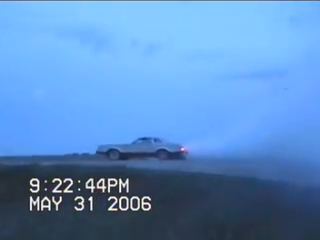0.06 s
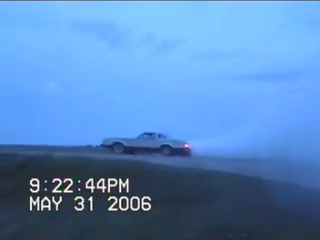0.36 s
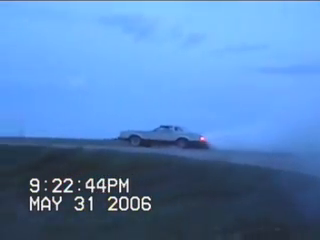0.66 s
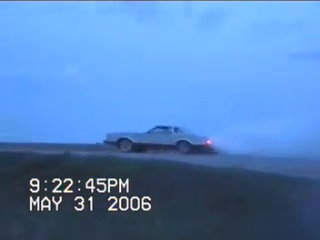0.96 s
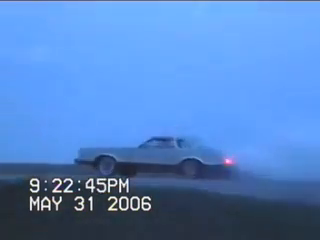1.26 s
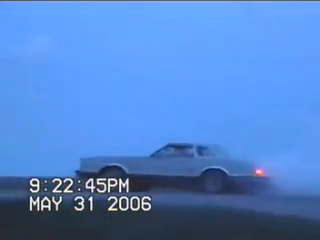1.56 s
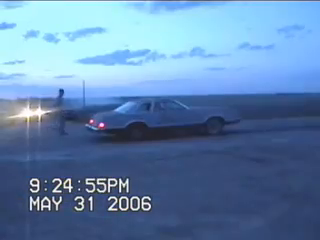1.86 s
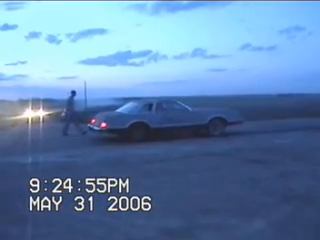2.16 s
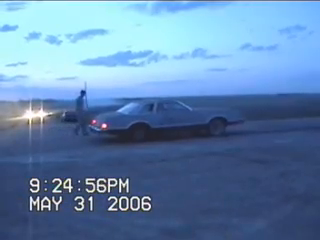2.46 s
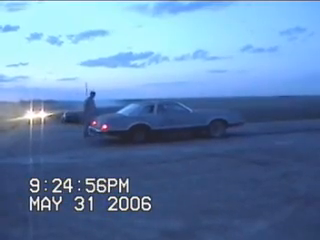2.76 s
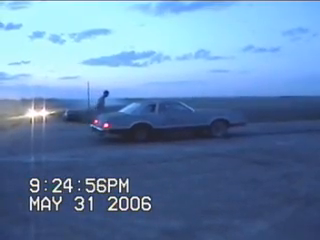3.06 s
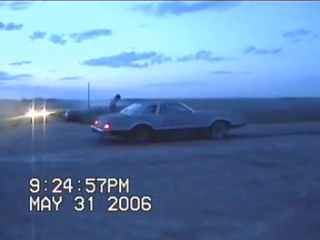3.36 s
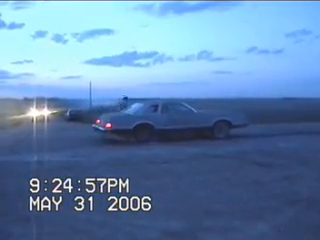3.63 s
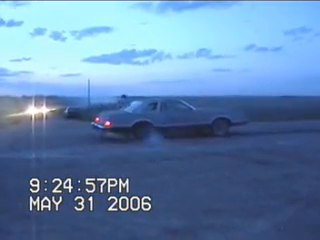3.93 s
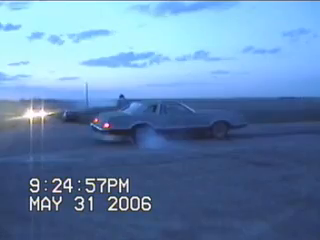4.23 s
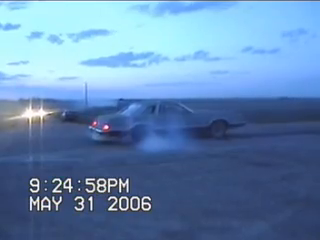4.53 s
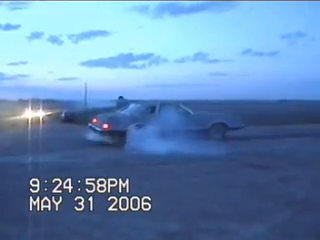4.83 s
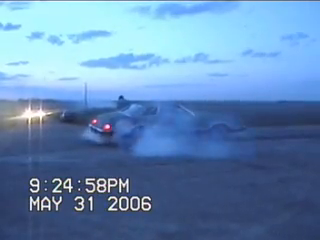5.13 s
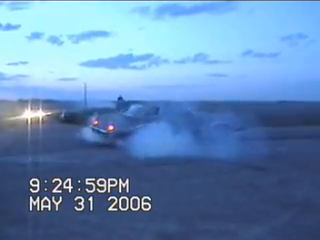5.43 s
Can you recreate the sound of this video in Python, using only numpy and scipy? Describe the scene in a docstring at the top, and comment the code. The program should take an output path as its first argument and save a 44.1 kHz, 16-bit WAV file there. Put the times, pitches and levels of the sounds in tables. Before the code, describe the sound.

A car creeps past on a gravel lot, one rear tyre spinning and spraying grit. The wheel winds down in ever slower slaps and groans briefly while low wind bumps the microphone. After a scuff and a short lull, the tyre barks loose and slaps ever faster. The engine comes in with rising revs as the gritty scrub turns to an even hiss. It all sounds thin, from some way off.

```python
"""A gravel lot at dusk: a V8 saloon does thin-sounding burnouts some way from a small camcorder.
First the car creeps past, a rear tyre spinning and spraying grit. The wheel winds down in ever slower
slaps and groans once, while low wind rumble bumps the microphone. Then, standing, the tyre scuffs once,
pauses, breaks loose with a bark and slaps ever faster. The exhaust comes in and climbs with the revs as
the scrub of grit gives way to the even hiss of hot rubber."""
import sys
import numpy as np
from scipy import signal
from scipy.fft import rfft, irfft, next_fast_len
from scipy.io import wavfile
from scipy.ndimage import uniform_filter1d

SR = 44100
rng = np.random.default_rng(int(sys.argv[2]) if len(sys.argv) > 2 else 0)


def to_wav(sig):
    """Store sig (one row per channel, or 1-D mono) as 16-bit WAV at the path in sys.argv[1].

    Samples outside -1..1 are clipped; the rate is SR.
    """
    pcm = np.clip(np.atleast_2d(sig), -1, 1) * 32767
    pcm = np.round(pcm).astype(np.int16)
    wavfile.write(sys.argv[1], SR, pcm.T)  # frames by channels


N = 250929
TIME = np.arange(N) / SR

# Levels in the tables are relative; each source adds its own gain.
# wind buffets on the microphone: t/s, width/s, level/dB
BUFFETS = [(1.116, 0.03, -40.5), (1.164, 0.033, -55), (1.365, 0.051, -43.5), (1.442, 0.07, -66),
           (1.496, 0.04, -42.5), (1.66, 0.038, -48), (1.756, 0.06, -49)]
# their spectrum: f/Hz, level/dB
BUFFET_SPECTRUM = [(15, -8), (30, 8.5), (60, 1.5), (120, -6.5), (250, -26), (600, -20), (1200, -38)]
# eddies collapsing on the microphone: t/s, width/s, level/dB
EDDIES = [(1.101, 0.0095, -40), (1.134, 0.013, -36), (1.359, 0.0074, -35), (1.379, 0.0054, -33),
          (1.647, 0.01, -39), (1.788, 0.018, -36)]
# engine speed as the tyre spins up: t/s, firing rate/Hz
REVS = [(2.13, 61.9), (2.4, 93.7), (2.9, 131.9), (3.3, 162), (3.6, 180), (3.85, 200), (4.1, 216),
        (4.3, 229.5), (4.47, 254), (4.78, 252.5), (5.0, 276), (5.22, 302), (5.69, 303)]
# exhaust lines: multiple of the four-stroke cycle (eight firings), level/dB
EXHAUST_ORDERS = [(6, 3), (8, 17.5), (11, 3), (13, 6), (14, 4.5), (16, 5.5), (17, 1.5), (18, -10), (19, 7),
                  (20, -3.5), (21, 3.5), (22, 3.5), (23, 0), (24, -1.5), (25, -1), (26, 2), (27, 4.5),
                  (28, -1), (29, 0), (30, 5), (31, 3.5), (32, -3), (34, 4)]
# silencer and tailpipe, rippled by echoes off ground and body: f/Hz, level/dB
TAILPIPE = [(100, -7), (150, -2), (230, -7.5), (300, -12), (360, 2), (410, 5), (450, -2.5), (490, -18),
            (540, 9), (575, -12), (610, 0.5), (670, 9.5), (730, 2.5), (780, 0.5), (850, 8), (900, -3),
            (960, 2), (1020, -4), (1090, -16), (1160, -4), (1280, 0)]
# pushes of the throttle swell the growl: t/s, width/s, lift/dB
THROTTLE_PUSHES = [(4.39, .07, 4.5), (4.9, .09, 4), (5.2, .06, 2.5), (5.6, .08, 2)]
# tones of the slowing tyre's groan: mid-glide f/Hz, level/dB
GROAN_TONES = [(585, -51.5), (935, -53)]
# irregular lesser slaps and knocks between the main slaps: t/s, level/dB, ring f/Hz, fall/s
STRAY_KNOCKS = [(1.219, -23, 4000, .004), (1.398, -39, 3870, .006), (1.595, -26, 4460, 0.0086),
                (1.605, -33, 3900, .008), (1.689, -26, 4470, 0.012), (1.715, -24, 3950, 0.0055),
                (1.741, -29, 6400, 0.0045), (1.792, -27, 4580, 0.01), (1.821, -32, 4280, 0.011),
                (1.9075, -15.5, 3100, 0.0035), (2.118, -34, 2680, 0.028), (2.168, -30, 3580, 0.0044),
                (2.462, -25, 4200, 0.0019), (2.691, -39, 3850, 0.0026), (2.823, -24, 2960, .003)]
# one main slap a turn, as the wheel winds down and as it digs in: t/s, level/dB, ring f/Hz
SLOWING_SLAPS = [(.703, -53, 4200), (.736, -47, 3900), (.77, -33, 6100), (.803, -27, 5330),
                 (.837, -38, 5000), (.873, -34, 4800), (.9105, -21, 5970), (.9495, -28, 3760),
                 (.9865, -23, 4070), (1.0275, -20.5, 5950), (1.069, -24.5, 5500), (1.113, -16.5, 5600),
                 (1.1575, -22, 3900), (1.206, -26, 4340), (1.2555, -21.5, 4320), (1.309, -20.5, 4780),
                 (1.365, -19, 5300), (1.4265, -21.5, 4030), (1.494, -22.5, 3810), (1.5745, -24.5, 3800),
                 (1.665, -18.5, 4790), (1.7655, -20, 4270)]
QUICKENING_SLAPS = [(2.134, -20.5, 4610), (2.254, -25, 5180), (2.3465, -25, 3350), (2.431, -23, 3230),
                    (2.512, -25, 3130), (2.589, -24, 3180), (2.663, -21.5, 3740), (2.733, -26.5, 4250),
                    (2.7995, -25.5, 3800), (2.863, -24.5, 3640), (2.921, -28.5, 3330), (2.98, -33, 3300),
                    (3.037, -30, 3380), (3.095, -26, 3310), (3.147, -28.5, 3320), (3.2, -26.5, 3250),
                    (3.252, -33, 3320), (3.302, -36, 3300), (3.35, -39, 3350), (3.397, -44, 3300),
                    (3.445, -49, 3290), (3.492, -32, 3280), (3.537, -30.5, 3400), (3.582, -45, 3300),
                    (3.625, -29, 3280)]
# high spots of the tread that slap the ground: position/turns, level/dB
ROLLING_SPOTS = [(0, -2), (0.269, -20), (0.518, -18)]
STANDING_SPOTS = [(0, -1.5), (0.182, -4), (0.369, -8), (.58, -7)]
# bark and rasp of the tyre breaking loose: t/s, width/s, low f/Hz, high f/Hz, level/dB
BARK_BANDS = [(2.235, .065, 1900, 3100, -39.5), (2.2, .05, 4450, 5100, -42), (2.39, .12, 5050, 5650, -46)]
# scrub on loose grit (fast and slow wheel), on packed grit and of hot rubber: f/Hz, level/dB
LOOSE_GRIT_FAST = [(210, -86), (350, -58), (435, -70), (534, -25), (574, -6), (683, -44), (714, -7.5),
                   (887, -26), (954, -13.5), (1170, -9.5), (1590, -0.5), (2420, -3), (4140, 0),
                   (11300, -7.5), (14700, -94), (22000, -120)]
LOOSE_GRIT_SLOW = [(210, -81.5), (350, -53), (399, -33.5), (496, -15.5), (549, -57), (608, -7.5),
                   (767, -24), (813, -24.5), (1590, 0), (1780, -4.5), (2030, -6.5), (2490, -2),
                   (6140, -4.5), (11300, -9), (14700, -112), (22000, -120)]
PACKED_GRIT = [(210, -90), (350, -35), (534, -12), (599, -22), (673, -15), (779, -30.5), (1140, -13),
               (1240, -23.5), (1660, -2.5), (1860, -3.5), (3190, 1), (3910, -1.5), (8950, -4), (11300, -9),
               (14700, -140), (22000, -120)]
HOT_RUBBER = [(300, -18), (450, -16), (680, -13), (900, -12), (1300, -8), (1800, -0.5), (2100, 1.5),
              (2700, 3), (4200, 2.5), (6000, 0.5), (7300, 0), (9000, 0.5), (11300, -7)]
# resonances of tyre and wheel arch, heard from either side of the car: f/Hz, width/Hz, lift/dB
ROLLING_ARCH = [(633, 30, 7), (752, 25, 3), (848, 40, 24), (977, 23, 9.5), (1140, 40, 3.5), (1303, 27, 16),
                (1520, 184, 11), (1688, 28, 9.5), (2040, 230, 8), (4100, 1000, 2)]
STANDING_ARCH = [(436, 20, 7.6), (531, 25, 19), (830, 22, 9.4), (673, 110, 19.2), (962, 57, 16),
                 (1151, 99, 18), (1418, 16.7, 22.2), (1607, 105, 15.3), (2076, 71, 7.3), (2316, 23, 4.1),
                 (2765, 130, 4.4), (2940, 65, 4.3), (3230, 160, 6.7), (3470, 42, 5), (3600, 25, 5.9),
                 (4240, 23, 1.1), (4230, 140, 3.7), (5520, 81, 3.6), (7450, 1030, 1.6)]
# course of each burnout: t/s, scrub level/dB, fine spray level/dB
ROLLING_LEVELS = [(0.0, -33.5, -36), (0.44, -34, -38.5), (0.742, -35.5, -41.5), (1.122, -37.5, -45),
                  (1.292, -35, -47), (1.42, -39, -50), (1.484, -43.5, -52), (1.56, -44.5, -52),
                  (1.655, -43.5, -53), (1.7, -40.5, -51), (1.8, -34, -45)]
STANDING_LEVELS = [(2.16, -36.5, -41), (2.19, -36, -40.5), (2.31, -36.5, -41.5), (2.66, -38, -41),
                   (3.63, -39.5, -42), (4.7, -40, -39), (5.33, -39.5, -39), (5.66, -40.5, -40.5)]
# the tyre bites harder now and then: t/s, width/s, scrub lift/dB, spray lift/dB
BITES = [(2.85, 0.085, 2, 2), (3.2, 0.026, 1.5, 2), (3.89, 0.038, 1.5, 2), (4.42, 0.11, 1.5, 2),
         (4.595, 0.017, 2.5, 4), (5.24, 0.034, 2, 2.5)]
# resting offset of the camcorder's converters: left/full scale, right/full scale
DC_OFFSET = [.053, -.0105]


def undb(db):
    """Decibels to gain."""
    return 10 ** (np.asarray(db) / 20)


def unit(x):
    """Scale to rms 1."""
    return x / np.sqrt(np.mean(x ** 2))


def curves(rows):
    """Each column of a table of (t/s, value, ..) at every sample."""
    times, *columns = np.transpose(rows)
    return [np.interp(TIME, times, column) for column in columns]


def swell(at_s, width_s):
    """A bell-shaped rise and fall."""
    return np.exp(-((TIME - at_s) / width_s) ** 2)


def ramp(from_s, rise_s):
    """A straight rise from 0 to 1."""
    return np.clip((TIME - from_s) / rise_s, 0, 1)


def blend(a, b, from_s, to_s):
    """Pass from one texture to another at constant power."""
    share = ramp(from_s, to_s - from_s)
    return a * np.sqrt(1 - share) + b * np.sqrt(share)


def walk(rate_hz):
    """A smooth random wander with a spread near 1."""
    hold = int(SR / rate_hz)
    steps = np.repeat(rng.standard_normal(N // hold + 1), hold)
    return 1.563 * uniform_filter1d(uniform_filter1d(steps, hold), hold)[:N]


def level_at(hz, spectrum):
    """Read a spectrum of (f/Hz, level/dB) on a log-frequency axis."""
    f, db = np.transpose(spectrum)
    return np.interp(np.log(hz + 1e-3), np.log(f), db)


def colour(x, spectrum, resonances=(), spread=1.92):
    """Shape x by a spectrum, to rms 1; each damped resonance gathers energy from its neighbourhood."""
    size = next_fast_len(N)
    hz = np.arange(size // 2 + 1) * SR / size
    bass_cut_db = 40 * np.log10(np.maximum(spectrum[0][0] / (hz + 1), 1))
    db = level_at(hz, spectrum) - bass_cut_db
    for f, width, lift_db in resonances:
        detune = np.abs(hz - f) / max(width, np.clip(.075 * f, 55, 140))
        peak = np.exp(-(1.6 * detune) ** 3)
        hollow = np.exp(-2 * (detune / spread) ** 2) / spread
        db = db + lift_db * (peak - hollow)
    return unit(irfft(rfft(x, size) * undb(db), size)[..., :N])


def band(x, low_hz, high_hz, order=2):
    """Band-pass."""
    return signal.sosfilt(signal.butter(order, [low_hz, high_hz], "band", fs=SR, output="sos"), x)


def above(x, hz, order=8):
    """High-pass."""
    return signal.sosfilt(signal.butter(order, hz, "high", fs=SR, output="sos"), x)


def below(x, hz):
    """Low-pass without phase shift."""
    return signal.sosfiltfilt(signal.butter(6, hz, fs=SR, output="sos"), x)


def stereo(mid, side, side_db):
    """Left and right from a common and an opposed part."""
    return mid + undb(side_db) * side * np.array([[1], [-1]])


def wind(right_db=-10, breeze_db=-69, gusty_db=2):
    """Ragged low buffets, mostly on the microphone's left port, over the deep rumble of the breeze."""
    force = sum(undb(db) * swell(s, width) for s, width, db in BUFFETS) * undb(gusty_db * walk(68.9))
    buffets = band(colour(rng.standard_normal((2, N)), BUFFET_SPECTRUM), 8, 900) * force
    breeze = unit(band(rng.standard_normal((2, N)), 0.55, 93, order=6)) * undb(breeze_db)
    return (buffets + breeze) * undb([[0], [right_db]])


def eddy_thumps(collapse_s=0.0028, right_db=-14):
    """Pressure builds and drops abruptly right at the microphone, mostly on the left port."""
    pressure = sum(undb(db) * np.tanh((s - TIME) / collapse_s) * np.exp(-abs(TIME - s) / width)
                   for s, width, db in EDDIES)
    return pressure * undb([[0], [right_db]])


def exhaust(gas_db=-5, waver_db=3.2, flutter_db=2.2, scatter_db=1.2, jitter_rad=.2):
    """The V8's uneven banks add lines between the firing harmonics; gas puffs with every firing."""
    firing_hz, = curves(REVS)
    cycle = 2 * np.pi * np.cumsum(firing_hz * (1 + .007 * walk(22))) / SR / 8
    uneven_db = np.interp(firing_hz, [215, 270], [-2, 0])
    push_db = sum(db * swell(s, width) for s, width, db in THROTTLE_PUSHES)
    lines = 0
    for order, line_db in EXHAUST_ORDERS:
        db = line_db + level_at(order * firing_hz / 8, TAILPIPE) + waver_db * walk(14)
        db += (order % 8 > 0) * uneven_db + (order <= 8) * flutter_db * walk(40) + (order > 8) * push_db
        phase = order * cycle + jitter_rad * walk(65) + 2 * np.pi * rng.random()
        lines = lines + np.sqrt(2) * undb(db) * np.sin(phase)
    puffs = rng.standard_normal((2, N)) * (1 + np.cos(8 * cycle) / 2)
    gas = unit(band(colour(stereo(*puffs, side_db=-1), TAILPIPE), 340, 1100, order=5))
    lines = lines * undb(scatter_db * walk(75))  # no two cycles are equally strong
    throttle = ramp(from_s=3.08, rise_s=0.33) * undb(-3 * swell(4.2, 0.097))  # opens, later eases briefly
    revs_db = -74 + 6.0 * np.log2(firing_hz / 299)  # 6 dB louder for each octave of revs
    return (lines + undb(gas_db) * gas) * throttle * undb(revs_db)


def groan(at_s=1.725, width_s=0.035, glide_per_s=2.4):
    """Rubber sticks and slips hoarsely for a moment as the wheel nearly stops."""
    bend = 1 + np.clip(glide_per_s * (TIME - at_s), -.5, .5)
    tones = 0
    for hz, db in GROAN_TONES:
        slip = 1 + .035 * walk(260)
        tones = tones + undb(db) * np.sqrt(2) * np.sin(2 * np.pi * np.cumsum(hz * bend * slip) / SR)
    return tones * swell(at_s, width_s)


def reflections(x, share=.75, count=10, first_s=.0035, last_s=.018, drift_s=.00012):
    """Echoes off body panels and ground ripple the hiss; they shift slowly as the car squirms."""
    bounced = above(x, 600, order=2)
    knots_s = np.linspace(0, TIME[-1], 16)
    echoes = 0
    for _ in range(count):
        lag_s = rng.uniform(first_s, last_s)
        lag_s += drift_s * np.interp(TIME, knots_s, rng.standard_normal(len(knots_s)))
        echoes = echoes + rng.choice([-1, 1]) * bounced[:, np.arange(N) - (lag_s * SR).astype(int)]
    return unit(x + share * echoes / np.sqrt(count))


def grains(per_s, scatter_db, hiss_db=0):
    """Stones of very unequal size tick under the tread, over the smooth hiss of the finest dust."""
    hits = rng.random(N) < per_s / SR
    size = undb(scatter_db * np.minimum(rng.exponential(size=N), 4)) * rng.choice([-1, 1], N)
    mid = unit(unit(hits * size) + undb(hiss_db) * rng.standard_normal(N))
    return stereo(mid, rng.standard_normal(N), side_db=-10)


def blows(rows, grit, gain_db, ring_db, rise_s, tail_db, tail_s, mode_spread, count=10):
    """Each blow rings a cluster of modes and throws a burst of grit with a trail of falling stones."""
    out = np.zeros((2, N))
    t = np.arange(SR // 8) / SR
    attack = 1 - np.exp(-(t / rise_s) ** 2)
    for s, db, hz, fall_s in rows:
        shape = attack * (np.exp(-t / fall_s) + undb(tail_db) * np.exp(-t / tail_s))
        span = slice(int(s * SR), int(s * SR) + len(t))
        modes_hz = hz * (1 + mode_spread * rng.uniform(-1.024, 1, (count, 1)))
        modes = np.sin(2 * np.pi * (modes_hz * t + rng.random((count, 1)))).sum(axis=0)
        ring = modes * np.sqrt(np.sum(shape ** 2) / np.sum((shape * modes) ** 2))
        out[:, span] += undb(db + gain_db) * shape * (grit[:, span] + undb(ring_db) * ring)
    return out


def stray_knocks(grit):
    """Irregular lesser slaps and knocks fall between the main slaps."""
    return blows(STRAY_KNOCKS, grit, gain_db=-9, ring_db=0.5,
                 rise_s=0.0023, tail_db=-33, tail_s=0.017, mode_spread=0.182)


def spot_hits(main_slaps, spots, lesser_hz, fall_s):
    """Lesser high spots follow each turn's main slap; gives rows of t/s, level/dB, f/Hz, fall/s."""
    turns_s = np.gradient([row[0] for row in main_slaps])
    return [(s + position * turn_s, db + spot_db, lesser_hz if k else hz, fall_s)
            for (s, db, hz), turn_s in zip(main_slaps, turns_s)
            for k, (position, spot_db) in enumerate(spots)]


def tread_slaps(loose_grit, packed_grit):
    """The tread slaps the ground, ever slower as the wheel winds down, ever faster as it digs in."""
    slowing = spot_hits(SLOWING_SLAPS, ROLLING_SPOTS, lesser_hz=4360, fall_s=0.0064)
    quickening = spot_hits(QUICKENING_SLAPS, STANDING_SPOTS, lesser_hz=3440, fall_s=0.0052)
    winding_down = blows(slowing, loose_grit, gain_db=-7.5, ring_db=0,
                         rise_s=0.0012, tail_db=-17, tail_s=0.02, mode_spread=.15)
    digging_in = blows(quickening, packed_grit, gain_db=-6.5, ring_db=1.5,
                       rise_s=0.0014, tail_db=-18, tail_s=0.018, mode_spread=0.131)
    return winding_down + digging_in


def bark(grit, loose_s, rise_s=0.02):
    """Coarse grit barks and rasps as the tyre breaks loose."""
    rasps = sum(unit(band(grit, low, high)) * undb(db) * swell(s, width)
                for s, width, low, high, db in BARK_BANDS)
    return rasps * ramp(loose_s, rise_s)


def scrub_and_spray(x, burble_db=2.0, wander_s=.0007):
    """Coarse scrub and fine spray, each at rms 1; three low bands each waver in pitch and level."""
    coarse = below(x, 6500)
    rest, burble = coarse, 0
    for edge_hz in (590, 800, 1270):
        low = below(rest, edge_hz)
        rest = rest - low
        heard_s = TIME + wander_s * walk(12)
        wavering = np.array([np.interp(heard_s, TIME, side) for side in low])
        burble = burble + wavering * undb(burble_db * walk(25.91) + 3.5)
    return np.array([unit(rest + burble), unit(x - coarse)])


def throb(main_slaps, depth_db, flutter_db, skew=1.4):
    """The out-of-round tyre bites and lets go once a turn, from slap to slap; the tread chatters."""
    turns = np.interp(TIME, [row[0] for row in main_slaps], np.arange(len(main_slaps)))
    angle = 2 * np.pi * (turns % 1) ** skew
    bite = np.sin(angle) + 0.098 * np.sin(2 * angle)
    return undb(depth_db * bite + flutter_db * walk(170))


def rolling_tyre(scrub_gain_db=-1.6, spray_gain_db=-3.5):
    """The spinning tyre of the creeping car scrubs loose grit, duller as the wheel slows."""
    scrub_db, spray_db = curves(ROLLING_LEVELS)
    fast = colour(grains(per_s=5000, scatter_db=4.0), LOOSE_GRIT_FAST, ROLLING_ARCH)
    slow = colour(grains(per_s=2500, scatter_db=3.6), LOOSE_GRIT_SLOW, ROLLING_ARCH)
    scrub, spray = scrub_and_spray(reflections(blend(fast, slow, 0.334, 0.44), share=0.62))
    tyre = scrub * undb(scrub_db + scrub_gain_db) + spray * undb(spray_db + spray_gain_db)
    return tyre * throb(SLOWING_SLAPS, depth_db=1.1, flutter_db=0.82)


def standing_effort(loose_s, rise_s=0.02):
    """Gains of [scrub, spray]: a lull with one scuff, then steady spinning with a few harder bites."""
    bites_db = sum(np.outer(lifts_db, swell(s, width)) for s, width, *lifts_db in BITES)
    spinning = undb(curves(STANDING_LEVELS) + bites_db + [[-2.0], [-0.62]])
    lull = undb([[-49.5], [-53.5]])
    scuff = undb([[-36.5], [-42]]) * swell(at_s=1.918, width_s=0.064)
    loose = ramp(loose_s - rise_s / 2, rise_s)
    return np.hypot(lull, scuff) * (1 - loose) + spinning * loose


def standing_tyre(loose_s, grit_db=0.7, rubber_db=2.0):
    """The tyre digs through the grit, then heats up and hisses on the hard ground."""
    grit = colour(grains(per_s=2200, scatter_db=2.6), PACKED_GRIT, STANDING_ARCH)
    grit = scrub_and_spray(reflections(grit))
    grit *= throb(QUICKENING_SLAPS, depth_db=0.59, flutter_db=1.0)
    softer_arch = [(f, width, 0.98 * db) for f, width, db in STANDING_ARCH]
    rubber = colour(grains(per_s=6000, scatter_db=1.4, hiss_db=2.6), HOT_RUBBER, softer_arch)
    rubber = scrub_and_spray(reflections(rubber), burble_db=1.0, wander_s=.0002)
    rubber *= throb(QUICKENING_SLAPS, depth_db=0.27, flutter_db=0.66)
    scrub, spray = blend(grit * undb(grit_db), rubber * undb(rubber_db), from_s=3.34, to_s=4.07)
    scrub_gain, spray_gain = standing_effort(loose_s)
    return scrub * scrub_gain + spray * spray_gain


def scene(loose_s=2.149):
    """From some way off: the rolling burnout, then the standing one, with wind on the microphone."""
    tyre = blend(rolling_tyre(), standing_tyre(loose_s), from_s=1.6, to_s=1.832)
    loose_grit = reflections(colour(grains(per_s=3000, scatter_db=2.0), LOOSE_GRIT_SLOW, ROLLING_ARCH))
    packed_grit = reflections(colour(grains(per_s=2700, scatter_db=1.5), PACKED_GRIT, STANDING_ARCH))
    impacts = band(tread_slaps(loose_grit, packed_grit) + stray_knocks(loose_grit), 440, 10300)
    # tyre and bark are heard only above about 400 Hz, the slaps above about 900 Hz
    wheel = above(tyre + bark(packed_grit, loose_s), 376) + above(impacts, 913)
    return wheel + exhaust() + groan() + wind() + eddy_thumps()


def record(dry):
    """The camcorder cuts the top steeply; its converters rest a little off zero."""
    top_cut = signal.ellip(12, .2, 80, 11500, fs=SR, output="sos")
    return signal.sosfilt(top_cut, dry) + np.array(DC_OFFSET)[:, None]


dry = scene()
out = record(dry)
to_wav(out)
```